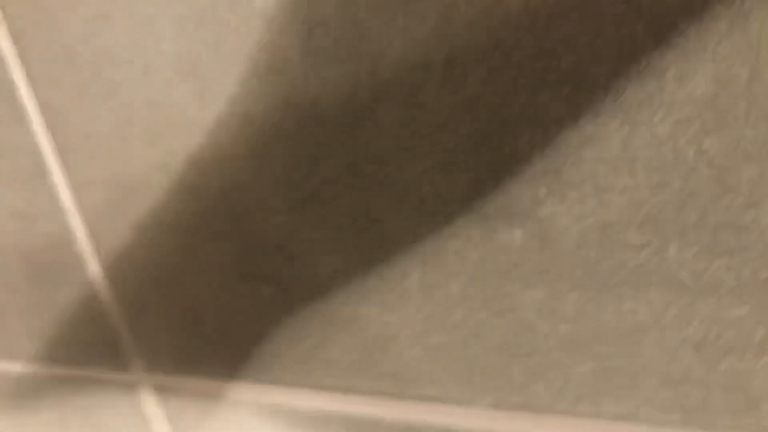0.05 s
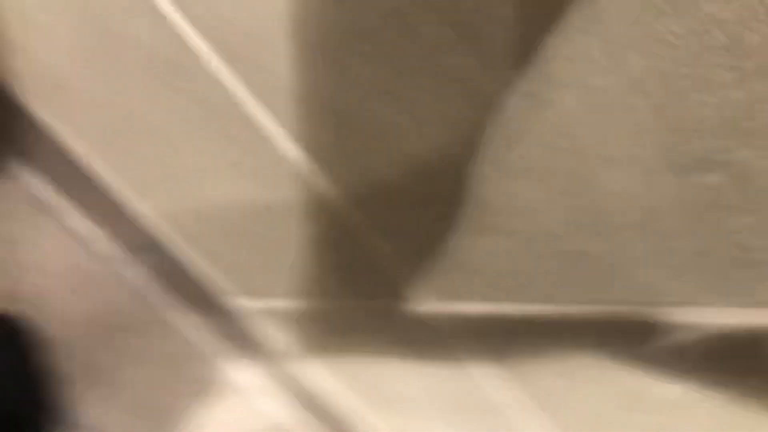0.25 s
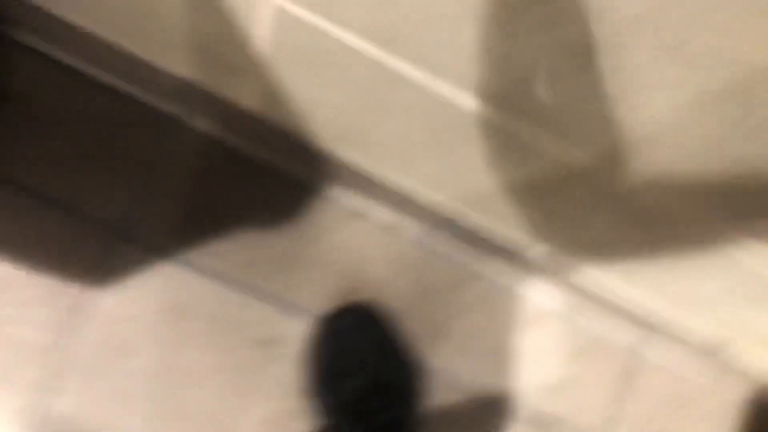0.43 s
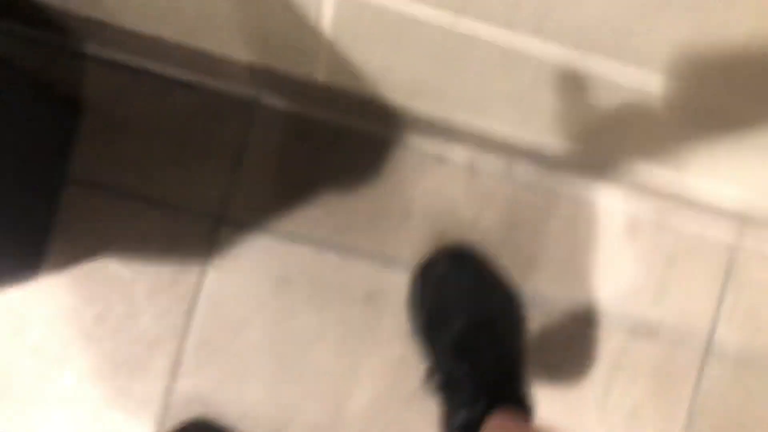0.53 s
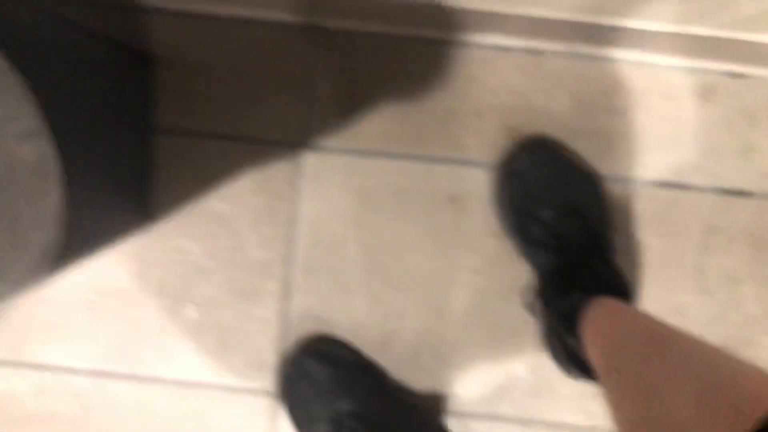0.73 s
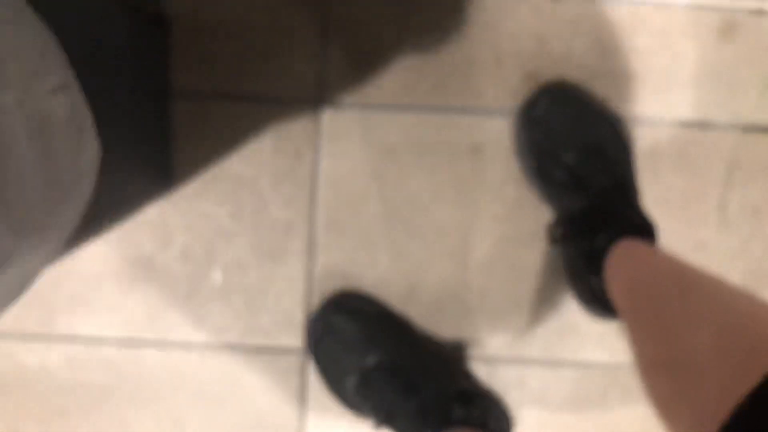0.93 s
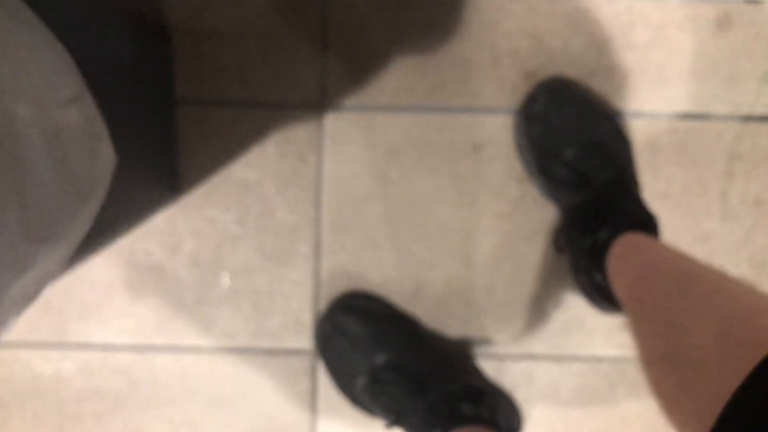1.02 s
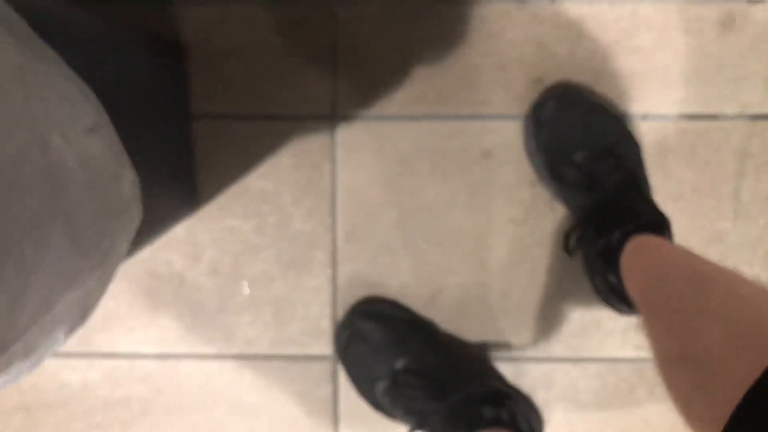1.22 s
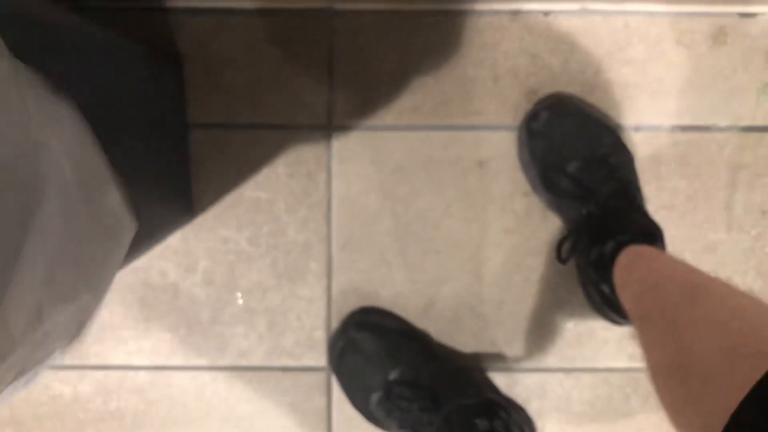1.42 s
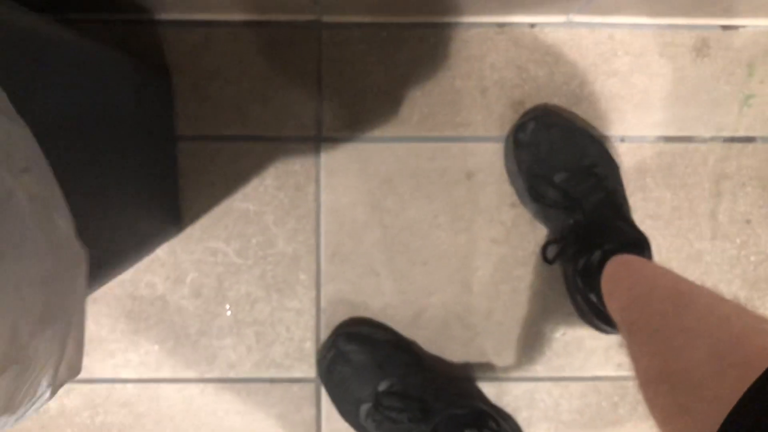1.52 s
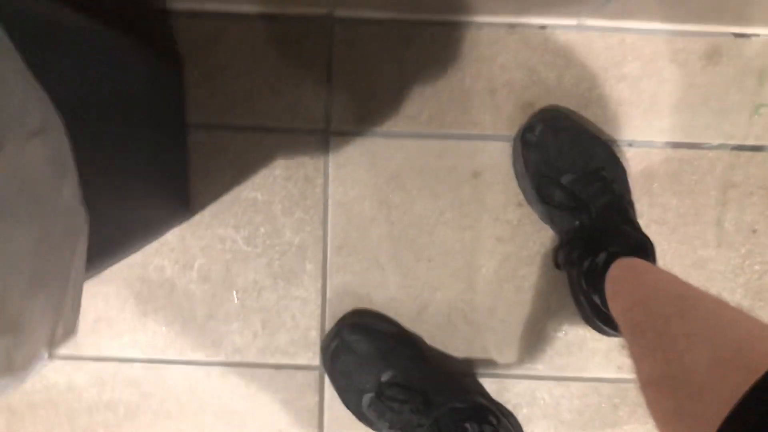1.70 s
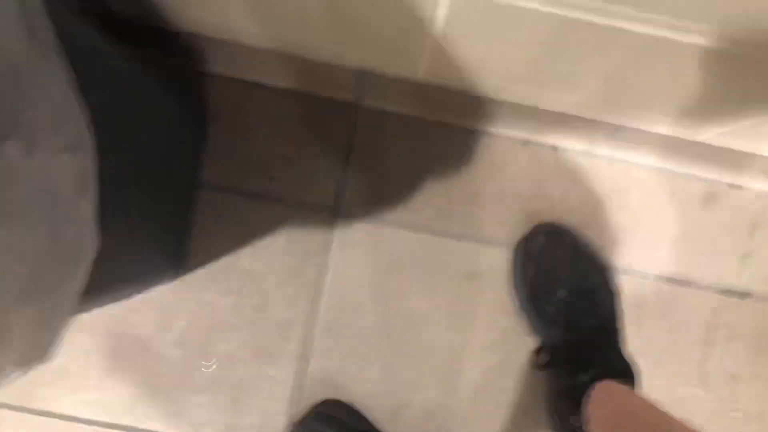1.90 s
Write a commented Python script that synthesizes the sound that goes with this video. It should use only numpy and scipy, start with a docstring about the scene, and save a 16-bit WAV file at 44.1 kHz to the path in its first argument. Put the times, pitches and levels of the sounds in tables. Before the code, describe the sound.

A hand dryer runs up with whining motor and rushing air, then coasts down.

```python
"""An electric hand dryer in a tiled restroom runs up, is switched off and coasts down.
Its fan whines at the blade-passing frequency, over the broadband noise of rushing air, which
excites the resonances of the housing. A low drone accompanies the run-up, and the room rumbles.
The microphone moves through the air stream, whose eddies buffet it with low, gusty pressure
fluctuations and push the recorder into its limiter."""
import sys
import numpy as np
from scipy import signal
from scipy.fft import rfft, irfft
from scipy.io import wavfile
from scipy.ndimage import uniform_filter1d, minimum_filter1d

SR = 44100
rng = np.random.default_rng(int(sys.argv[2]) if len(sys.argv) > 2 else 0)


def to_wav(sig):
    """Store sig (one row per channel, or 1-D mono) as 16-bit WAV at the path in sys.argv[1].

    Samples outside -1..1 are clipped; the rate is SR.
    """
    pcm = np.clip(np.atleast_2d(sig), -1, 1) * 32767
    pcm = np.round(pcm).astype(np.int16)
    wavfile.write(sys.argv[1], SR, pcm.T)  # frames by channels


N = 85995
T = np.arange(N) / SR


def amp(db):
    """Decibels to amplitude ratio."""
    return 10 ** (np.asarray(db) / 20)


def unit(x):
    """Normalisation to rms 1."""
    return x / np.sqrt(np.mean(x ** 2) + 1e-20)


def curves(rows):
    """Linear interpolation of each column over the times in the first."""
    times, *columns = np.transpose(rows)
    return [np.interp(T, times, column) for column in columns]


def spectrum_at(points, hz):
    """Interpolation on a logarithmic frequency axis."""
    f, value = np.transpose(points)
    return np.interp(np.log(hz + 1), np.log(f + 1), value)


def noise(shape):
    """Spectral shaping: white noise weighted by shape(Hz), at rms 1."""
    return unit(irfft(rfft(rng.standard_normal(N)) * shape(np.fft.rfftfreq(N, 1 / SR)), N))


def drift(rate_hz):
    """Random fluctuation: noise low-passed at the given rate."""
    return noise(lambda f: 1 / (1 + (f / rate_hz) ** 2) ** 2)


START_HZ, TOP_HZ, RUN_UP_S = 1903, 3383, .25
OFF_S, COAST_S, COAST_POWER = 1.219, 1.05, 1.4
def fan_speed():
    """Blade-passing frequency in Hz: an exponential approach to top speed, then slowing by drag."""
    powered = TOP_HZ - (TOP_HZ - START_HZ) * np.exp(-np.minimum(T, OFF_S) / RUN_UP_S)
    return powered / (1 + np.maximum(T - OFF_S, 0) / COAST_S) ** COAST_POWER


# Each row: time in seconds, level of the direct whine at the moving microphone in dB.
WHINE_LEVEL = [(0, -43), (.06, -50), (.11, -39), (.2, -53), (.245, -32.5), (.31, -33), (.41, -26),
               (.445, -34), (.495, -23), (.56, -25), (.635, -23.5), (.67, -44.5), (.70, -32), (.765, -25.5),
               (.79, -45), (.825, -22), (.92, -22.5), (1.035, -28.5), (1.07, -38), (1.19, -59),
               (1.245, -37.5), (1.31, -38), (1.36, -32.5), (1.45, -44), (1.57, -36), (1.67, -45),
               (1.70, -57), (1.745, -42.5), (1.795, -51), (1.84, -45.5), (1.95, -39)]
def whine(blade_hz):
    """Modulation by turbulence broadens the blade tone; reverberation prolongs its earlier pitches."""
    wobbling_hz = blade_hz * (1 + .0012 * drift(rate_hz=99))
    phasor = np.exp(2j * np.pi * np.cumsum(wobbling_hz) / SR)
    turbulence = amp(-10) * (drift(rate_hz=210) + 1j * drift(rate_hz=210)) / np.sqrt(2)
    tone = unit((phasor * (1 + turbulence)).real)
    direct_db = curves(WHINE_LEVEL)[0] + 1.6 * drift(rate_hz=22)
    room_db = -47 + 22 * np.log2(blade_hz / TOP_HZ)  # 22 dB weaker per halving of speed
    return tone * amp(direct_db) + reverberation(tone * amp(room_db))


# Each row: frequency in Hz, time for the tiled room to decay by 60 dB in seconds.
REVERB_TIMES = [(200, .8), (2500, 1.0), (10000, 0.85)]
def reverberation(x):
    """Dense reflections from the tiles decay exponentially, each band at its own rate."""
    hz, t, bands = signal.stft(rng.standard_normal(SR), SR, nperseg=256)
    decay = np.exp(-np.log(1000) * t / spectrum_at(REVERB_TIMES, hz)[:, None])
    tail = signal.istft(bands * decay, SR, nperseg=256)[1]
    return signal.fftconvolve(x, tail / np.linalg.norm(tail))[:N]


def zero_phase(x, order, hz, kind):
    """Butterworth filtering forwards and backwards, which cancels the phase shift."""
    return signal.sosfiltfilt(signal.butter(order, hz, kind, fs=SR, output="sos"), x)


# Each row: time in seconds, level of the rushing air in dB.
AIR_LEVEL = [(0, -31.5), (.13, -27), (.25, -24), (.38, -21), (.5, -19), (.555, -18), (.59, -19),
             (.645, -21.5), (.73, -23), (.79, -23.5), (.83, -17.5), (.95, -21.5), (1.1, -26.5), (1.25, -27),
             (1.37, -29.5), (1.54, -33.5), (1.73, -37), (1.95, -38.5)]
# Each row: frequency in Hz, relative spectral density of the rush in dB.
AIR_SPECTRUM = [(30, -30), (60, -37), (120, 5), (170, -14.5), (280, 4), (400, -3.5), (600, -1.5),
                (850, -11), (1080, -9), (1400, -10.5), (1950, -14.5), (3000, -15.5), (3700, -15.5),
                (5000, -18.5), (6500, -18), (8500, -21), (10500, -26), (12500, -31), (15500, -31.5)]
# Each row: resonant frequency of the housing in Hz, width in Hz, level relative to the rush in dB.
HOUSING_MODES = [(1067, 70, -15), (2288, 133, -14.5), (2790, 150, -17.5), (3150, 480, -20),
                 (5300, 340, -24.5), (6040, 250, -25.5)]
def rushing_air(blade_hz, treble_loss_db=14.5, bass_loss_db=6.5):
    """Flow noise excites the housing's resonances; it brightens with speed and loses bass in coasting."""
    rush = noise(lambda f: amp(spectrum_at(AIR_SPECTRUM, f)))
    octaves = np.log2(blade_hz / TOP_HZ)  # both losses are per halving of fan speed
    treble_change = zero_phase(rush, 1, 8000, "high") * (amp(treble_loss_db * octaves) - 1)
    bass_change = zero_phase(rush, 2, 1500, "low") * (amp(bass_loss_db * octaves * (T > OFF_S)) - 1)
    resonances = sum(amp(db) * noise(lambda f: 1 / (1 + 2 * ((f - hz) / width) ** 2))
                     for hz, width, db in HOUSING_MODES)
    level_db = curves(AIR_LEVEL)[0] + .93 * drift(rate_hz=61)
    return (rush + treble_change + bass_change + resonances) * amp(level_db)


# Each row: time in seconds, frequency of the drone in Hz, level in dB.
DRONE_GLIDE = [(0, 100, -36), (.08, 94, -34), (.14, 97, -27), (.19, 104, -35), (.24, 111, -21.5),
               (.31, 118, -24), (.34, 123, -37), (.45, 130, -80)]
def drone(flutter_db=1):
    """A low tone climbs during the run-up, wavering by random amplitude modulation."""
    hz, db = curves(DRONE_GLIDE)
    tone = unit(np.sin(2 * np.pi * np.cumsum(hz) / SR))
    return tone * amp(db + flutter_db * drift(rate_hz=35))


# Each row: frequency in Hz, relative spectral density of the room's rumble in dB.
RUMBLE_SPECTRUM = [(20, -17), (45, -1), (65, 3), (100, -9), (200, -36), (600, -35), (2000, -80)]
def room_rumble():
    """Stationary low-frequency noise forms the background of the room."""
    return amp(-37.5) * noise(lambda f: amp(spectrum_at(RUMBLE_SPECTRUM, f)))


# Each row: time in seconds, level of the stream on the microphone in dB, upper corner in Hz.
AIR_STREAM = [(0, -34, 314), (.39, -27, 301), (.425, -21, 525), (.475, -21, 563), (.52, -11.5, 570),
              (.62, -12.5, 574), (.70, -7.5, 700), (.77, -6.5, 583), (.85, 0, 510), (1.0, -6.5, 493),
              (1.17, -9.5, 495), (1.27, -14, 400), (1.38, -13.5, 295), (1.46, -19.5, 280), (1.6, -23, 274),
              (1.7, -25.5, 208), (1.79, -25.5, 186), (1.86, -34.5, 170), (1.95, -51, 163)]
# Each row: frequency in Hz, relative spectral density in dB before the roll-off at the corner.
BUFFET_SPECTRUM = [(15, -32), (30, -48), (55, -1), (90, -1), (130, 3.5), (250, 1.5), (330, -3), (450, -1.5),
                   (800, -7)]
def buffeting(swing_db=.5, swing_octaves=.15, rolloff_order=4.3):
    """Turbulent pressure on the microphone: the harder an eddy hits, the higher its rumble reaches."""
    level_db, corner_hz = curves(AIR_STREAM)
    eddies = drift(rate_hz=69)
    corner_hz = corner_hz * 2 ** (swing_octaves * eddies)
    hz, centres_hz = np.fft.rfftfreq(N, 1 / SR), np.geomspace(20, 5000, 25)
    spectrum = rfft(rng.standard_normal(N)) * amp(spectrum_at(BUFFET_SPECTRUM, hz))
    # Overlapping triangular bands let the corner move over time.
    bands = np.array([irfft(spectrum * np.interp(hz, centres_hz, peak, right=0), N)
                      for peak in np.eye(len(centres_hz))])
    rolloff = 1 / np.sqrt(1 + (centres_hz[:, None] / corner_hz) ** (2 * rolloff_order))
    return unit((bands * rolloff).sum(0)) * amp(level_db + swing_db * eddies)


def add_eddy(mix, start_s, db, corner_hz, attack_s=.002, decay_s=.004, rolloff_order=3.3):
    """Mixes in one eddy's impact: a transient of low noise with fast rise and exponential decay."""
    t = T[:2048]
    ratio = np.fft.rfftfreq(len(t), 1 / SR) / corner_hz
    passband = ratio / np.sqrt(1 + ratio ** (2 * rolloff_order + 2))
    body = irfft(rfft(rng.standard_normal(len(t))) * passband)
    burst = body * np.minimum(t / attack_s, 1) * np.exp(-t / decay_s)
    burst *= amp(db) * np.sqrt(decay_s * SR / np.sum(burst ** 2))  # energy of db held for decay_s
    span = mix[round(start_s * SR):][:len(burst)]
    span += burst[:len(span)]


def sputter(eddies_per_s=45, relative_db=-13.5, spread_db=6.5):
    """Small eddies arrive as a Poisson process, following the stream in level and bandwidth."""
    out = np.zeros(N)
    level_db, corner_hz = curves(AIR_STREAM)
    for i in np.flatnonzero(rng.random(N) < eddies_per_s / SR):
        db = level_db[i] + relative_db + spread_db * rng.standard_normal()
        add_eddy(out, T[i], db, .98 * corner_hz[i])
    return out


# Each row: centre of the pulse in seconds, peak level in dB, half width in seconds.
PRESSURE_PULSES = [(0.421, -15.5, 0.0029), (0.4504, -5.5, 0.0024), (0.611, -15, 0.0038)]
def pressure_pulses():
    """As the jet first meets the microphone, large eddies give bipolar pulses: suction, then a push."""
    return sum(amp(db) * (T - centre) / width * np.exp(.5 - .5 * ((T - centre) / width) ** 2)
               for centre, db, width in PRESSURE_PULSES)


# Each row: start of the gust in seconds, level in dB, upper corner in Hz.
STRONG_GUSTS = [(0.481, -12, 825), (0.498, -10, 740), (0.527, -16, 1150), (.58, -26, 900),
                (0.592, -14.5, 780), (0.625, -12, 780), (.65, -12, 680), (.69, -11.5, 940),
                (0.713, -14, 885), (.741, -2, 770), (0.829, -7, 694), (.904, -8, 596), (0.94, -4.5, 587),
                (1.021, -12, 650), (1.05, -7, 510), (1.125, -12, 560), (1.359, -20, 450), (1.386, -8, 206),
                (1.438, -22.5, 425), (1.487, -17.5, 392), (1.626, -23, 390), (1.751, -23, 200)]
def gusts():
    """Turbulence is intermittent: strong eddies strike the microphone as separate bursts."""
    out = np.zeros(N)
    for start_s, db, corner_hz in STRONG_GUSTS:
        add_eddy(out, start_s, db, corner_hz)
    return out


def scene():
    """Superposition of the dryer, the room and the air stream at one microphone."""
    blade_hz = fan_speed()
    airborne = whine(blade_hz) + rushing_air(blade_hz) + drone() + room_rumble()
    return (airborne + buffeting() + sputter() + pressure_pulses() + gusts())[None]


def record(dry, low_cut_hz=33, ceiling=.97, recovery_db_per_s=99, band_limit_hz=15800):
    """Peak limiting ducks everything under the gusts, after a low cut and before the band limit."""
    dry = zero_phase(dry, 2, low_cut_hz, "high")
    excess_db = np.maximum(20 * np.log10(abs(dry[0]) / ceiling + 1e-9), 0)
    recovery_db = T * recovery_db_per_s
    reduction_db = np.maximum.accumulate(excess_db + recovery_db) - recovery_db
    # The gain eases down just ahead of each peak.
    gain_db = uniform_filter1d(minimum_filter1d(-reduction_db, size=129), size=129)
    low_pass = signal.firwin(511, band_limit_hz, window=("kaiser", 9), fs=SR)
    return signal.oaconvolve(dry * amp(gain_db), low_pass[None], "same")


dry = scene()
out = record(dry)
to_wav(out)
```